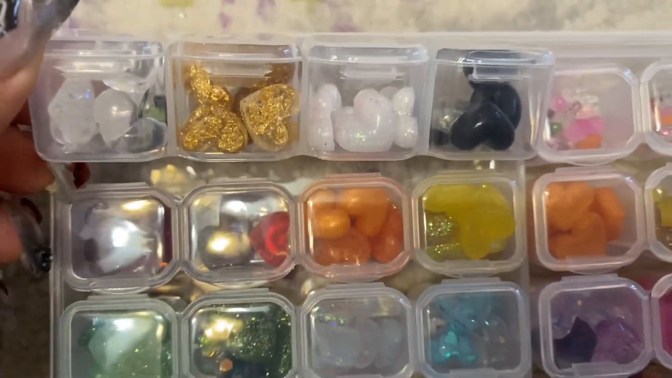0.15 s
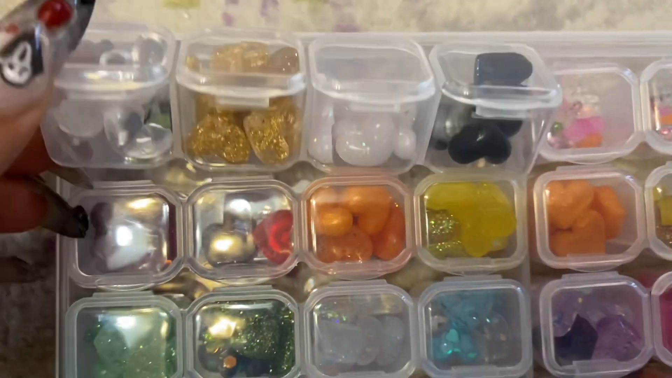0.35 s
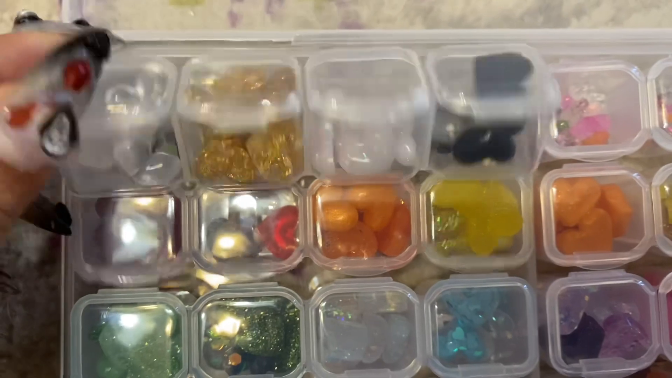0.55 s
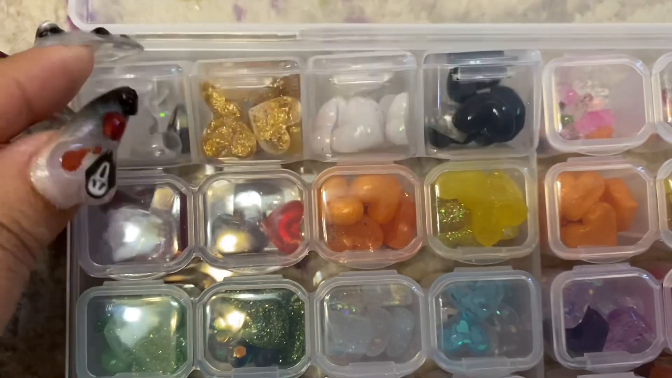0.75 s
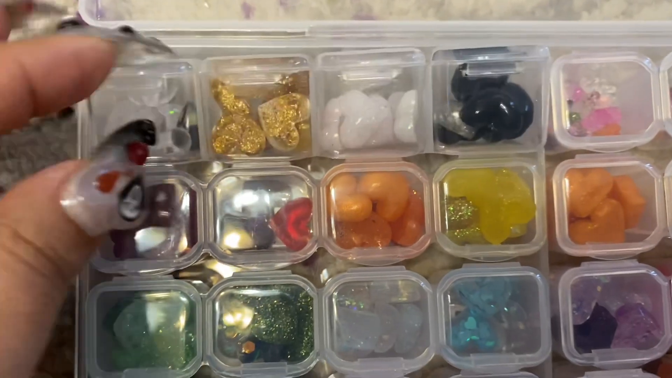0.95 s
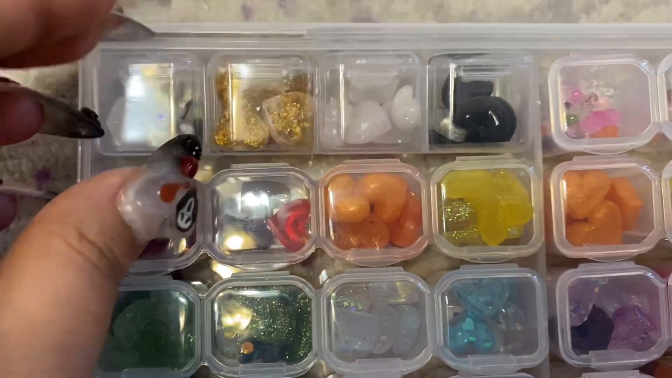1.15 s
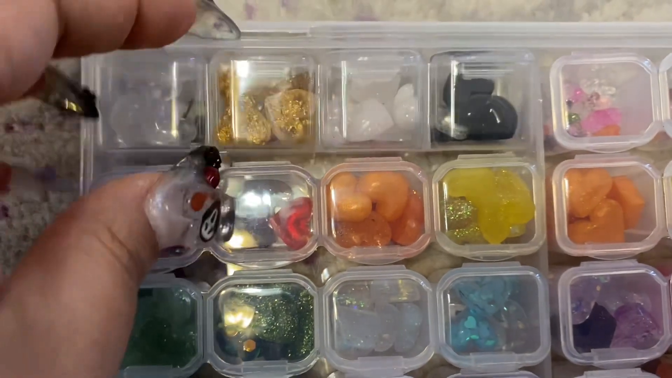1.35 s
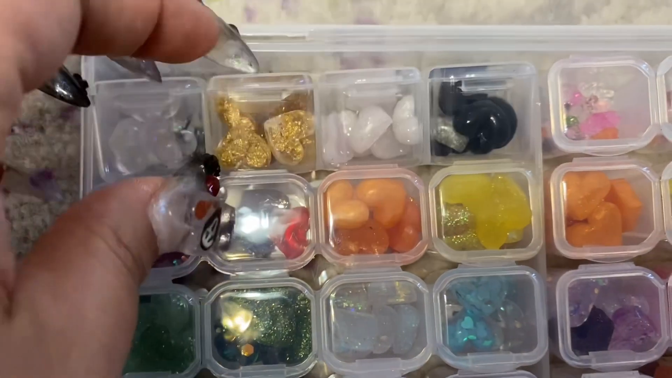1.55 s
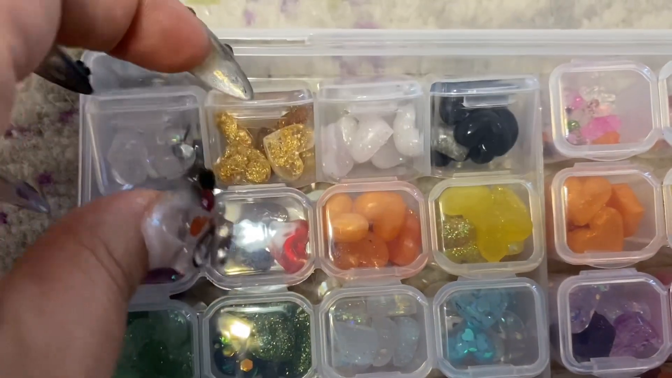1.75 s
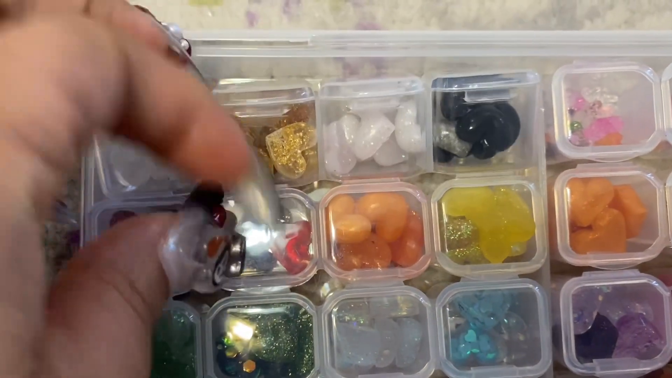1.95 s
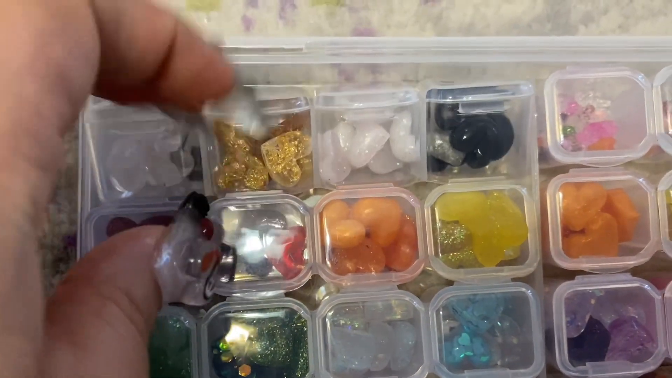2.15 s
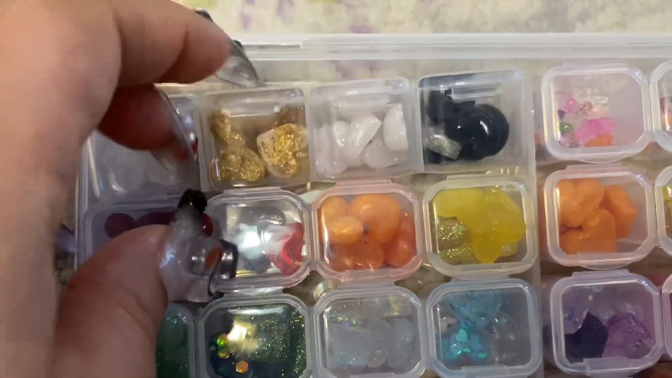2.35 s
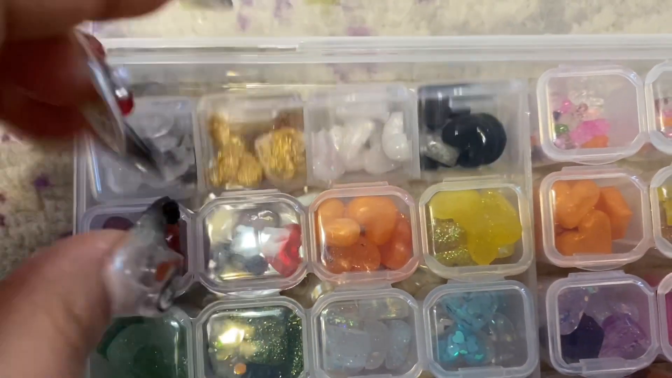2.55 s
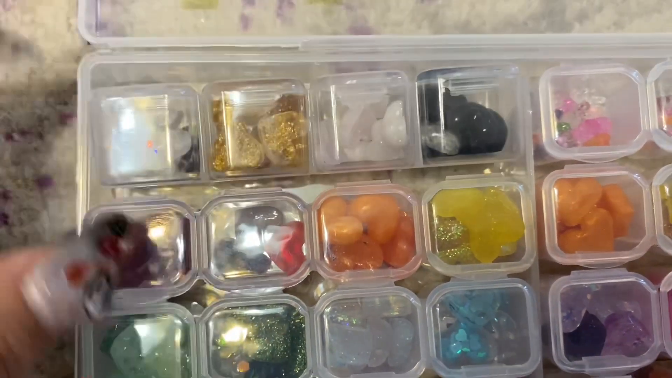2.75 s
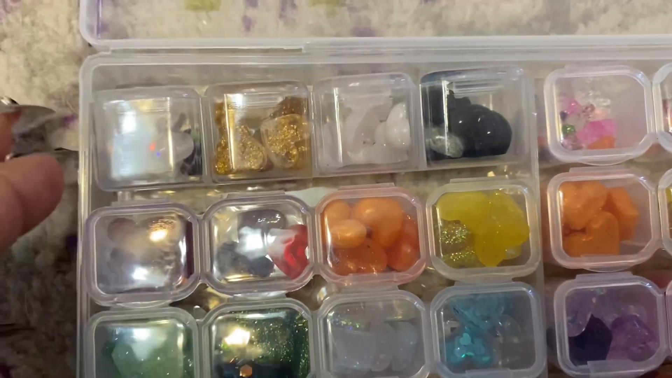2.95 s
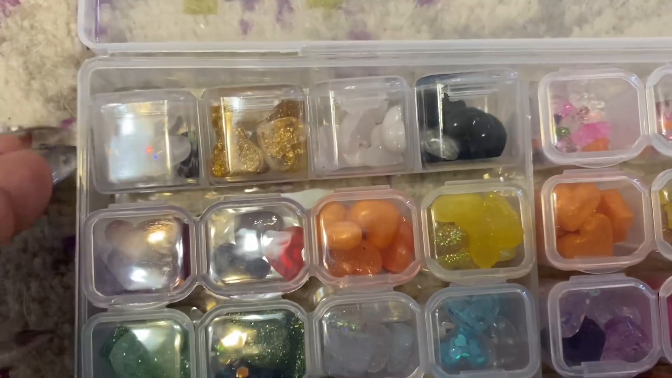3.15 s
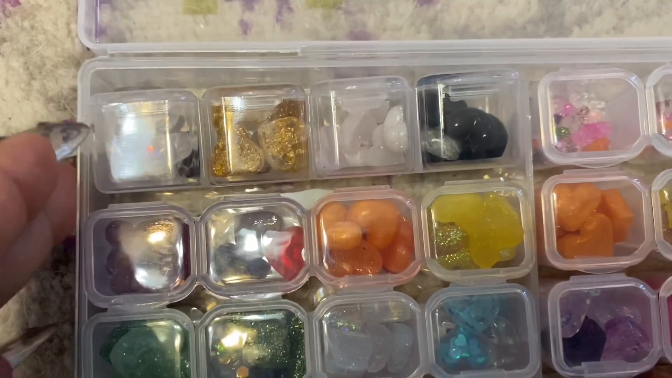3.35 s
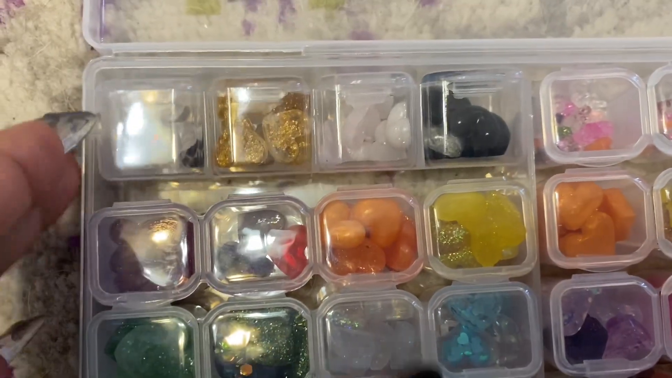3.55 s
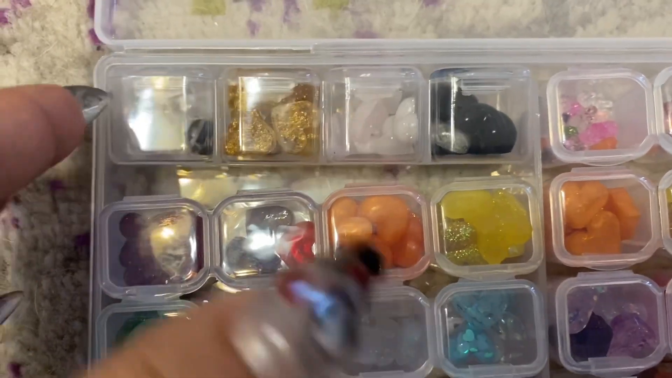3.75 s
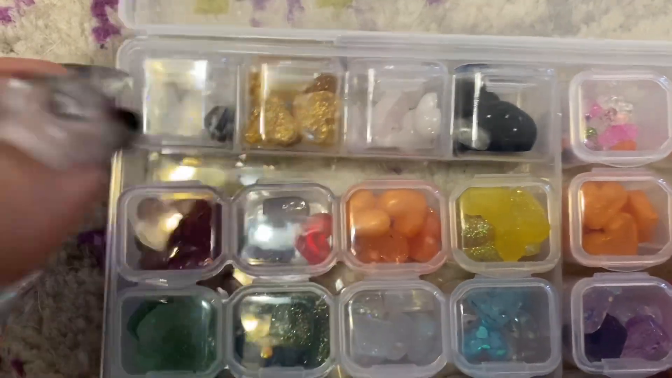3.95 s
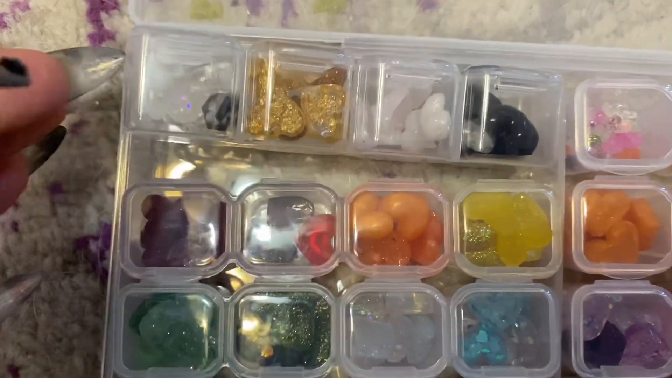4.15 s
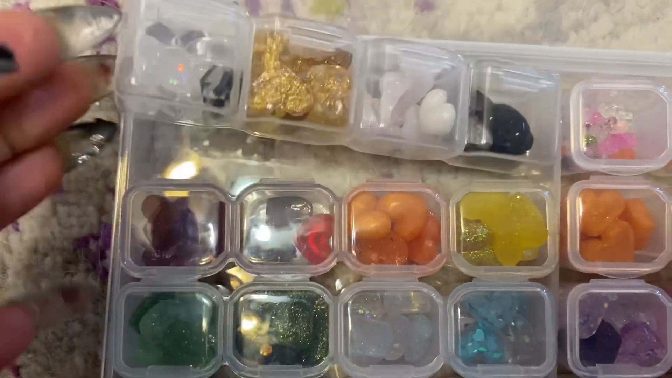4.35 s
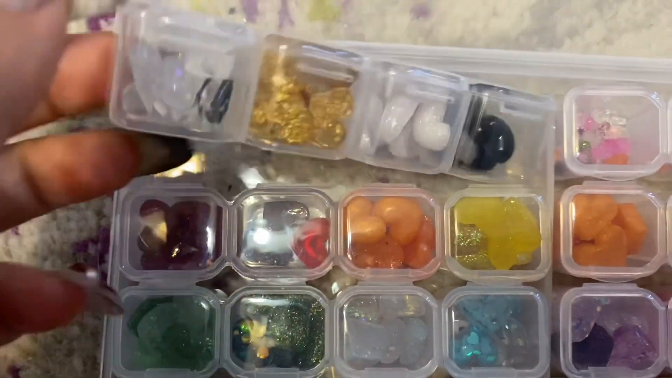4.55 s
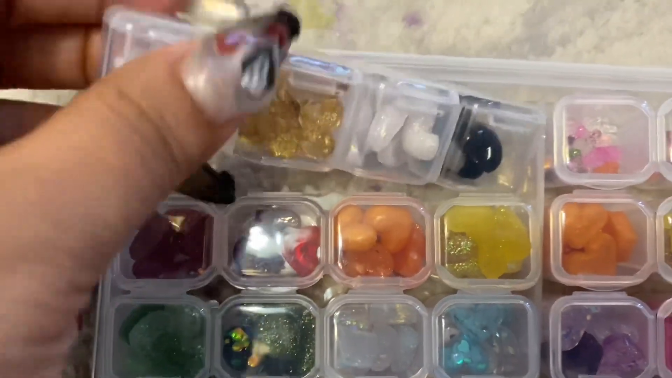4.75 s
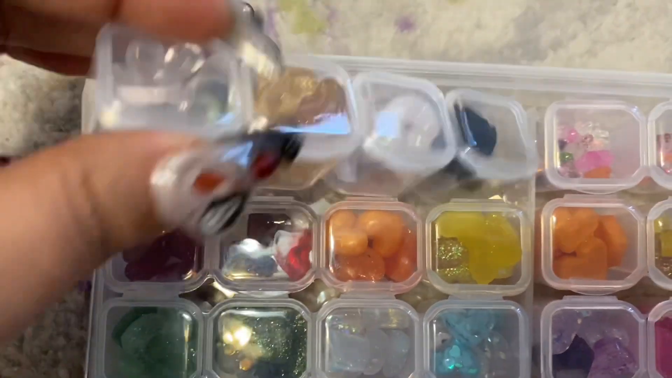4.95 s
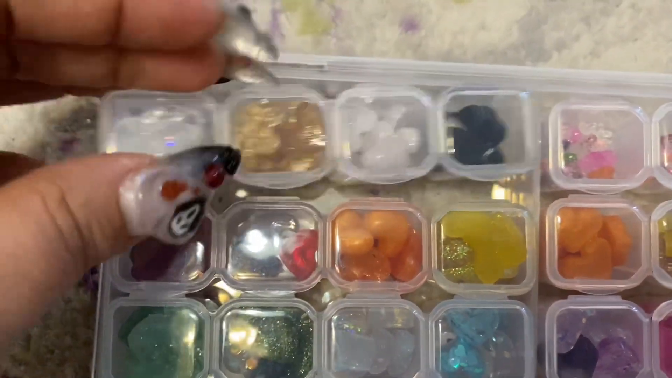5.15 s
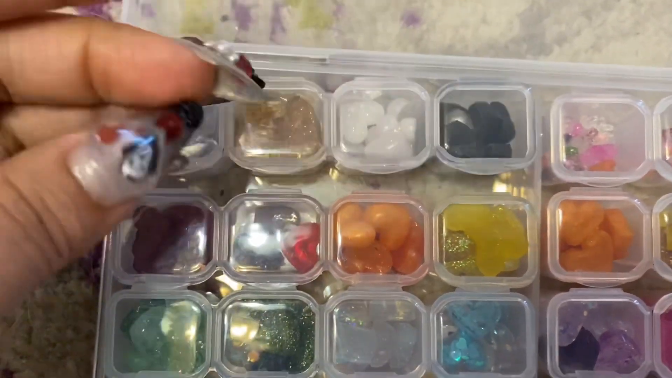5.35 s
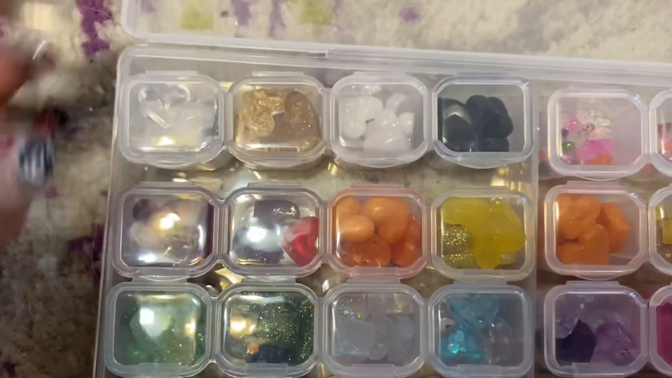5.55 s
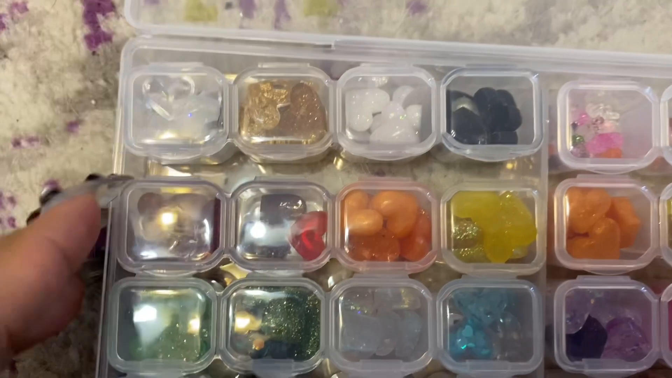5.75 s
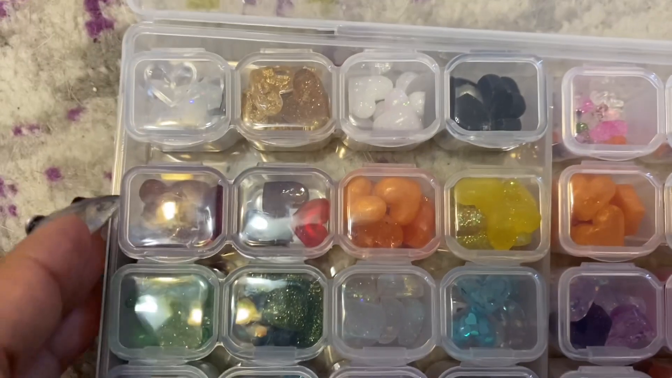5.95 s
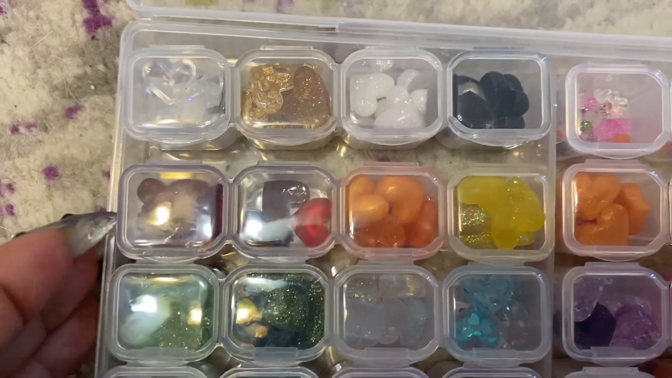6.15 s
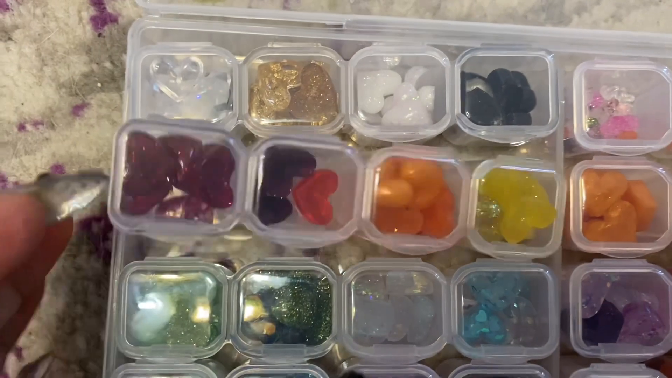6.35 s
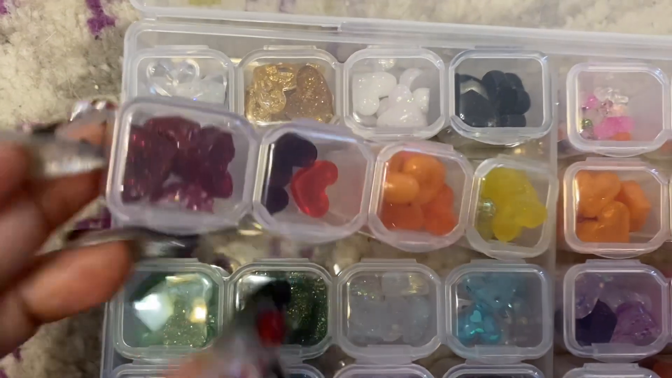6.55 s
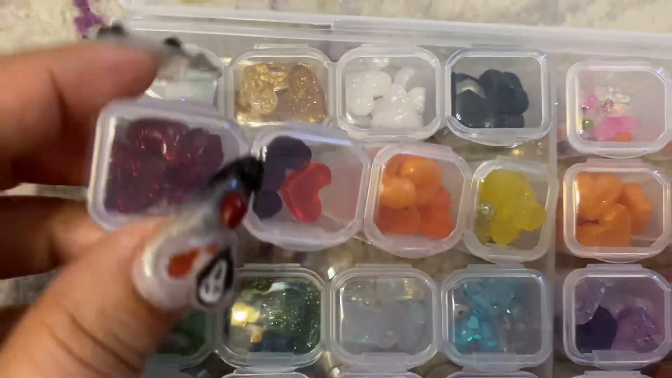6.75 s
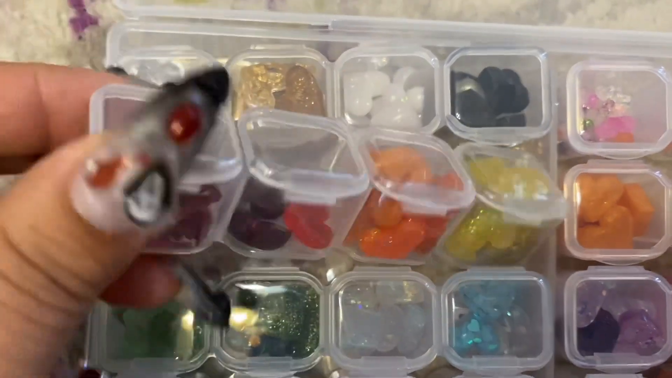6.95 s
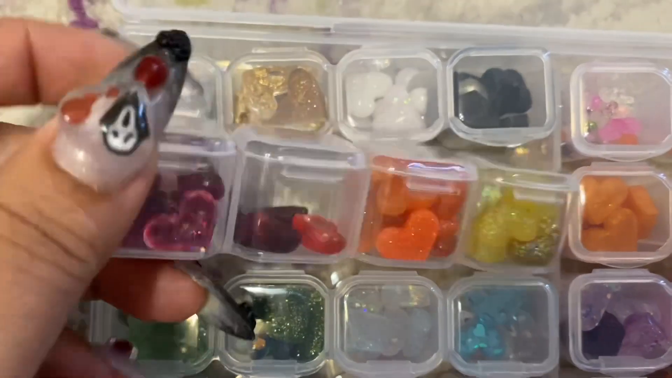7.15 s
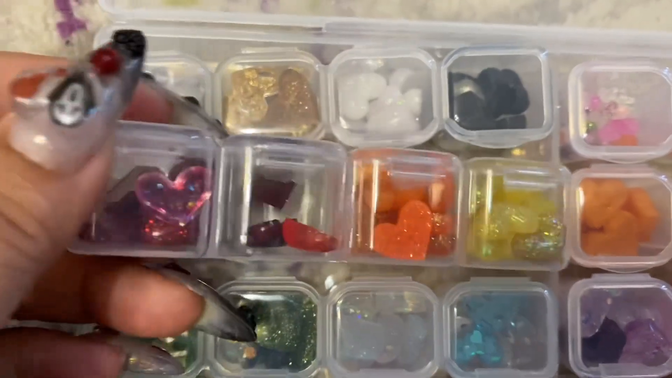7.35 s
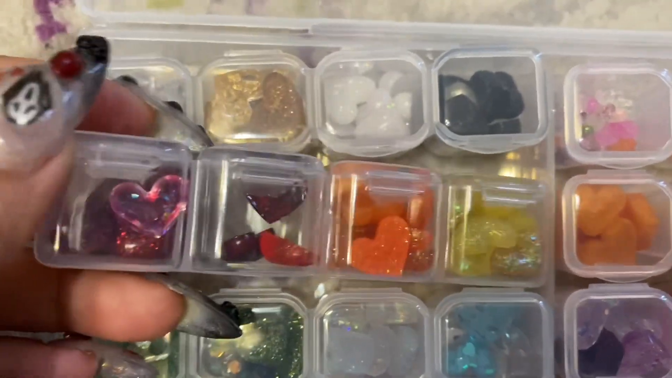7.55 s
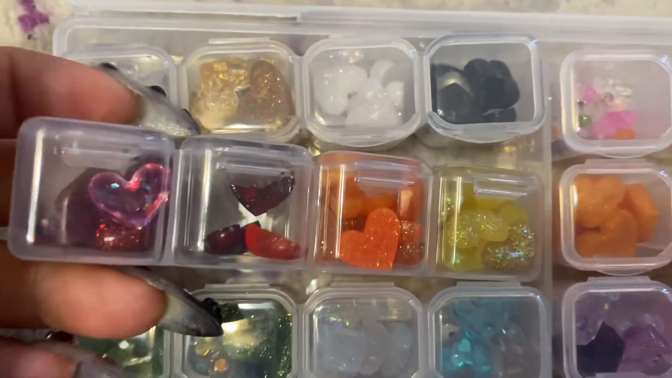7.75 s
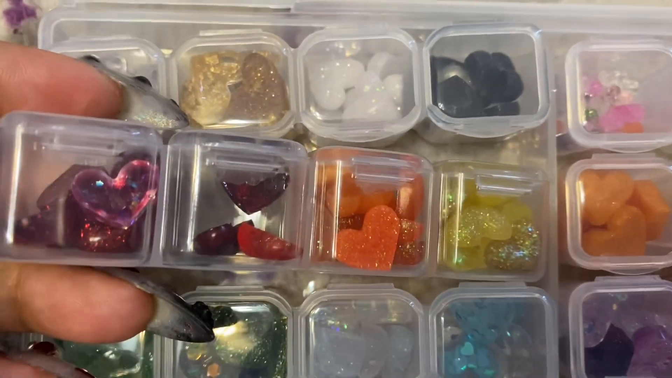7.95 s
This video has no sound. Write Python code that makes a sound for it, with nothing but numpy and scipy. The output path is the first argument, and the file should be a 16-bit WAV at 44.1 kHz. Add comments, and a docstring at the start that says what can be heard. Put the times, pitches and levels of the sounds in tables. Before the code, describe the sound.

Long fingernails pry, click and snap small lidded plastic compartments in a hollow organiser tray, with rasps, bead rattles and soft thumps.

```python
"""In a small furnished room, close to a phone, long fingernails work at a plastic organiser tray on carpet:
they pry out strips of small lidded compartments, turn them and press them back.
Contacts are short rough forces ringing resonances of walls, lids and rims, with a hollow knock from the tray.
Stick-slip jerks drive the same plastic for rasps and rubbing; skin hisses, beads rattle and low modes thump.
Diffuse noise tails give the room's faint answer, shaped noise its air; what exceeds full scale clips."""
import sys
import numpy as np
from scipy import signal
from scipy.fft import rfft, irfft
from scipy.io import wavfile
from scipy.ndimage import uniform_filter1d

SR = 44100
rng = np.random.default_rng(int(sys.argv[2]) if len(sys.argv) > 2 else 0)


def master(y):
    """Save y as 16-bit WAV."""
    cut = np.clip(np.atleast_2d(y).T, -1, 1)
    pcm = np.round(cut * 32767)  # scale
    wavfile.write(sys.argv[1], SR, pcm.astype(np.int16))


N = 353241

# resonances of the plastic, from side walls over lids to the stiff rims:
# (centre [Hz], width of one filter pass [Hz], level [dB])
PLASTIC_MODES = [(1290, 450, -4), (1788, 560, 2), (2220, 1400, 2), (2656, 410, -1.5), (3164, 530, 3.5),
                 (3588, 360, -2.5), (4375, 1000, 3), (5307, 390, -8.5), (5850, 3400, -0.5), (6790, 920, 2),
                 (7760, 610, 0), (11090, 2600, -1.5), (12300, 530, -15), (13900, 530, -6.5)]
# a catch or a rim lets go with a bright snap: (time [s], lid ring [dB], hollow knock [dB re lid],
# hard tick [dB re lid], favoured lid resonance [Hz], contact t60 [ms], left minus right [dB])
SNAP_EVENTS = [(0.535, -9, -6, -6, 2640, 13, 10.5), (0.9568, -8.5, -13, -8.5, 3830, 7, 3),
               (1.0565, -2, -5.5, -4, 3900, 34, 7), (1.1437, -15.5, -17.5, -1, 3240, 2.9, 7),
               (1.2042, -4.5, -19, -12, 4130, 5.1, 4), (1.2655, -11.5, -15.5, -9, 4430, 9, 2.5),
               (1.3425, -2, -11.5, 0.5, 3500, 23, 1), (1.3697, -1.5, -13.5, -8.5, 3140, 123, 2.5),
               (1.5244, 0.5, -11, -3, 3550, 28.4, 0), (1.7188, -2, -8, -1.5, 2960, 8.9, 2.5),
               (2.1381, -3, -16, -4.5, 3500, 8.1, -3), (2.1559, -13.5, -4, -1, 3300, 14, 4.5),
               (2.2387, -13, -11, -8, 3300, 9, 4), (2.2508, -11, -18, -10, 3200, 10, 6),
               (2.3217, -5, -27, -12, 3100, 6.8, 8), (2.3837, -12.5, -6.5, -6, 2480, 25, 8),
               (2.5111, -0.5, -11.5, -1.5, 3370, 7.4, -3.5), (2.5302, -2.5, -11, -5.5, 3220, 11, 5),
               (2.5891, -10.5, -29, -13, 3100, 8.3, 4.5), (2.792, -14, -10.5, 1, 4580, 7, -0.5),
               (3.282, -12, -21, -4.5, 3400, 7.2, 3), (3.714, -17.5, -13.5, -16, 3290, 4.5, 7.5),
               (4.4503, -12, -4.5, -5.5, 2705, 5.6, 6.5), (5.02, -11, -10, 9, 5800, 26, 1),
               (5.6446, -11.5, -15, -11.5, 2280, 5.5, 7.5), (5.6973, -11, -2.5, -7, 3200, 2.4, -0.5),
               (5.7109, -14.5, -14, -7, 3300, 7, 8.5), (6.7443, -19, -7, -5.5, 2610, 63, 4.5),
               (7.2472, -11, -32, -10.5, 3250, 2.4, 2), (7.3537, -9, -26, -11.5, 3340, 7.7, 5),
               (7.3712, -11.5, -32, -15.5, 3350, 5, 0), (7.3846, -16.5, -12, -10, 3200, 2.8, 5.5)]
# a strip bumps into the hollow tray: (time [s], knock level [dB], lid ring [dB re knock],
# knock pitch [Hz], thump on the carpet [dB])
KNOCK_EVENTS = [(0.021, -29.5, -14, 1040, -38.5), (0.09, -33.5, -52, 745, -36.5),
                (0.2367, -15.5, -23.5, 1200, -34.5), (0.6909, -4.5, 0, 733, -16),
                (0.99, -17, -3.5, 845, -28), (1.0482, 1, -2, 503, -18.5), (1.2621, -31, 4.5, 899, -32),
                (1.6937, -13, -4.5, 830, -27), (1.8395, -26.5, -16, 840, -31.5),
                (1.9043, -17, -2.5, 860, -24.5), (1.9542, -20, 5.5, 590, -25),
                (2.167, -23.5, 6.5, 590, -23.5), (2.2244, -13, -6.5, 860, -23.5),
                (2.5663, -4, -2.5, 618, -25), (4.394, -1, -1, 750, -22), (4.481, -8.5, -7.5, 715, -31.5),
                (4.6322, -16.5, -9, 695, -33), (4.975, 1, 2.5, 644, -28.5), (5.0102, 0, 4, 660, -12.5),
                (5.264, -4, 6.5, 395, -16.5), (5.721, -11, -8.5, 830, -38), (5.9516, -27, -3, 786, -35),
                (6.3241, -13, -8, 700, -37), (6.4885, -18, -21, 740, -48), (6.753, -26.5, 1, 798, -50),
                (6.812, -41.5, -18, 760, -37.5), (6.9166, -2.5, -11, 643, -24.5),
                (7.1535, -22, -1.5, 780, -30.5), (7.593, -11.5, -10, 700, -30.5)]


def undb(db):
    """Amplitude factor of a level in dB."""
    return 10 ** (np.asarray(db) / 20)


def unit(x):
    """Scale to rms 1."""
    return x / np.sqrt(np.mean(x ** 2) + 1e-20)


def burst(x):
    """Scale a short stereo sound to the energy of 2 ms at rms 1."""
    return x * np.sqrt(2 * .002 * SR / (np.sum(x ** 2) + 1e-20))


def decay(t, t60_s):
    """Exponential decay by 60 dB in t60_s seconds."""
    return np.exp(-np.log(1000) * t / t60_s)


def resonate(x, hz, width):
    """A resonance applied twice, for steep skirts; the width in Hz is that of one pass."""
    b, a = signal.iirpeak(min(hz, SR * .45), hz / width, fs=SR)
    once = signal.lfilter(b, a, x + 1e-18)
    return signal.lfilter(b, a, once)


def band(x, low_hz, high_hz):
    """Band-pass."""
    sos = signal.butter(2, [low_hz, min(high_hz, SR * .48)], "band", fs=SR, output="sos")
    return signal.sosfilt(sos, x)


def pair(count, apart):
    """Left and right noise: a common part, and a part that differs."""
    common, side = rng.standard_normal((2, count))
    return np.array([common + apart * side, common - apart * side])


def pan(db):
    """Gains of the two channels; db is left minus right."""
    return undb(np.array([[db], [-db]]) / 2)


def add(out, s, x):
    """Mix x into out from time s on."""
    i = max(int(s * SR), 0)
    out[:, i:i + x.shape[1]] += x[:, :max(N - i, 0)]


def walk(rate_hz):
    """Slow chance: random levels, rate_hz of them a second, joined smoothly, spread near 1."""
    levels = rng.standard_normal(400)
    joined = np.interp(np.arange(N) / SR * rate_hz, np.arange(400), levels)
    return 1.3 * uniform_filter1d(joined, size=1500)


def swell(start, end, edge_s):
    """Rise smoothly at start, hold, and fall at end."""
    t = np.arange(N) / SR
    return np.sin(np.pi / 2 * np.clip(np.minimum(t - start, end - t) / edge_s, 0, 1))


def air(level_db=-57):
    """Still air of the room: low rumble and faint hiss as shaped noise; now and then a soft low tone."""
    # colour of the noise: (frequency [Hz], relative density [dB per Hz])
    air_colour = [(20, -23), (40, -4), (70, 0.5), (130, -4), (200, -11), (350, -12), (700, -33),
                  (3000, -34), (8000, -38.5), (16000, -37.5)]
    # faint tones that swell and fade: (start [s], end [s], middle pitch [Hz], level [dB])
    low_tones = [(2.779, 2.901, 337, -48), (7.11, 7.277, 272, -52), (7.75, 7.977, 274, -57)]
    hz, db = np.transpose(air_colour)
    colour = undb(np.interp(np.log(np.arange(N // 2 + 1) * SR / N + 1), np.log(hz), db))
    out = undb(level_db) * unit(irfft(rfft(pair(N, apart=0.12)) * colour, N))
    for start, end, tone_hz, tone_db in low_tones:
        wavering_hz = tone_hz * (1 + 0.012 * walk(rate_hz=7.8))
        phase = 2 * np.pi * np.cumsum(wavering_hz) / SR
        out = out + undb(tone_db) * swell(start, end, edge_s=0.045) * np.sin(phase)
    return out


def room(x, gap_s=0.0068):
    """A faint diffuse tail, decaying noise in four bands, lasts longest in the presence range."""
    # decay by band: (lower edge [Hz], upper edge [Hz], t60 [s], level before the band-pass [dB])
    room_bands = [(100, 500, .45, -30), (500, 2200, .52, -27), (2200, 4600, .66, -26),
                  (4600, 12000, .34, -30)]
    t = np.arange(int(.8 * SR)) / SR
    response = 0
    for low_hz, high_hz, t60, db in room_bands:
        tail = pair(len(t), apart=0.88) * decay(t, t60) * np.minimum(t / gap_s, 1)
        response = response + undb(db) * band(unit(tail) / np.sqrt(len(t)), low_hz, high_hz)
    return signal.fftconvolve(x, response, axes=1)[:, :N]


def ports(x):
    """Sound reaches the two microphone ports with a phase difference that depends on frequency."""
    # (frequency [Hz], phase by which left leads [rad])
    port_phase = [(0, 0.5), (700, 0.39), (1800, 1.38), (3100, 0.56), (5200, 0), (7100, -2.5), (8400, -3),
                  (11000, -7), (16000, -12.5)]
    hz, radians = np.transpose(port_phase)
    turn = np.exp(1j * np.interp(np.arange(N // 2 + 1) * SR / N, hz, radians))
    return np.array([irfft(rfft(x[0]) * turn, N), x[1]])


def lifted(s):
    """Whether a strip is held clear of the tray at time s."""
    # (start [s], end [s])
    lift_spans = [(4.3, 5.2), (6.65, 7.55)]
    return any(start < s < end for start, end in lift_spans)


def contacts():
    """All snaps, knocks and taps as (s, lid dB, knock dB, clack dB, tick dB, lid Hz, knock Hz, t60 ms, pan dB)."""
    # a nail taps lightly on the plastic: (time [s], lid ring [dB], hollow knock [dB re lid])
    tap_events = [(0.2987, -36, 6), (0.3748, -29.5, -8), (0.417, -28, 4.5), (0.58, -22, -8),
                  (0.6103, -16, -27.5), (0.6298, -17.5, -16.5), (0.6999, -12, -10.5), (0.7824, -30.5, 5.5),
                  (0.882, -24.5, -3.5), (0.9107, -23.5, -0.5), (1.083, -16, -10), (1.764, -26, -14.5),
                  (2.0533, -24, -19), (2.0692, -24, -7.5), (2.1513, -16, -5), (2.1877, -24.5, -6.5),
                  (3.018, -37, 9.5), (3.305, -29, 7), (3.3531, -45, 15), (3.6114, -27.5, 1),
                  (3.632, -38.5, 10.5), (3.6863, -26.5, -10), (3.9718, -31, -12), (4.3109, -36.5, -0.5),
                  (4.3757, -23, -15.5), (4.505, -20.5, -18), (4.5458, -30.5, -4), (4.6949, -31.5, -3.5),
                  (4.7212, -29, -14.5), (4.759, -23.5, -18), (4.8776, -29.5, 3.5), (4.9348, -20, 5),
                  (5.0595, -15.5, -22), (5.0699, -20, -5), (5.1215, -19.5, -9.5), (5.1593, -20.5, -3),
                  (5.8939, -40, 3), (6.4047, -39, -1), (6.43, -40, 2), (6.683, -18.5, -16.5),
                  (6.725, -24, -28), (6.835, -22.5, -14.5), (6.9529, -21.5, -4), (7.0016, -28.5, 2.5),
                  (7.0836, -34, 5.5), (7.2237, -31.5, -9), (7.399, -21, -11), (7.5199, -30.5, -3.5)]
    hand_pan_db = 3.5  # the hand works at the left end
    # clack (side walls) and tick (rims) are in dB re the lid; clicks() shifts both
    snaps = [(s, db, knock_db, -6, tick_db, lid_hz, 820, t60_ms, pan_db)
             for s, db, knock_db, tick_db, lid_hz, t60_ms, pan_db in SNAP_EVENTS]
    knocks = [(s, db + lid_db, -lid_db, -2.5, -6, 2400, knock_hz, 14, hand_pan_db)
              for s, db, lid_db, knock_hz, _ in KNOCK_EVENTS]
    taps = [(s, db, knock_db, 0, -4.5, 3380, 780, 9.2, hand_pan_db)
            for s, db, knock_db in tap_events]
    return snaps + knocks + taps


def shoves(snap_thump_db=-27.5):
    """Knocks push the tray against the carpet, and so do snaps while the strip sits in it: (s, dB)."""
    from_knocks = [(s, thump_db) for s, *_, thump_db in KNOCK_EVENTS]
    from_snaps = [(s, db + snap_thump_db) for s, db, *_ in SNAP_EVENTS if not lifted(s)]
    return from_knocks + from_snaps


def thumps(push_s=0.012, lead_s=.002, scuff_db=-9, scuff_s=0.016):
    """A soft shove rocks the whole tray in its low modes, and its hollow floor scuffs for a moment."""
    # the loaded tray on the carpet: (middle pitch [Hz], t60 [s], middle level [dB])
    tray_modes = [(73, 0.13, -8.5), (102, 0.069, -1), (122.3, 0.089, -2), (158, 0.13, -4), (261, 0.013, -2),
                  (364.4, 0.041, -0.5)]
    out = np.zeros((2, N))
    t = np.arange(int(.3 * SR)) / SR
    onset = np.sin(np.pi / 2 * np.minimum(t / push_s, 1)) ** 2
    for s, db in shoves():
        rock = 0
        for hz, t60, mode_db in tray_modes:
            detune, strength = rng.standard_normal(2)
            swing = np.sin(2 * np.pi * (hz * (1 + .07 * detune) * t + rng.random()))
            rock = rock + undb(mode_db + 2 * strength) * swing * decay(t, t60) * onset
        loudest = np.sqrt(uniform_filter1d(rock ** 2, size=800).max())
        scuff = unit(resonate(pair(len(t), apart=.15), 680, 1100)) * onset * np.exp(-t / scuff_s)
        add(out, s - lead_s, undb(db) * (rock / loudest + undb(scuff_db) * scuff) * pan(0.86))
    return out


def strip_speed(rest_db=-70.5, skid_db=-35.5, skid_db_per_db=.6, skid_s=0.045):
    """A strip slides while the hand moves it, and skids on, slowing down, after every contact."""
    # the hand moves a strip about: (start [s], end [s], speed [dB])
    hand_moves = [(-.1, 0.186, -60), (0.171, 0.493, -53), (0.473, 1.457, -45.5), (1.45, 2.72, -55.5),
                  (3.15, 3.55, -56.5), (3.526, 4.083, -53), (4.216, 4.85, -47.5), (4.81, 5.285, -44.5),
                  (5.24, 6.287, -62.5), (6.3, 6.901, -59), (6.891, 7.502, -49)]
    jolts = np.zeros(N)
    for s, db, *_ in contacts():
        jolts[int(s * SR)] += undb(skid_db + skid_db_per_db * db) ** 2
    skid = np.sqrt(signal.lfilter([1], [1, -np.exp(-2 / (skid_s * SR))], jolts))
    moved = sum(undb(db) * swell(start, end, edge_s=0.021) for start, end, db in hand_moves)
    return undb(rest_db) + skid + moved


def plastic(force, apart, touch_db, size=1):
    """A rough force rings every mode as far as the touched spot allows: wall clack, lid ring, rim tick."""
    clack_below_hz, tick_above_hz = 2450, 5450
    parts = np.zeros((3, 2, len(force)))
    for (hz, width, db), spot_db in zip(PLASTIC_MODES, touch_db):
        group = int(hz > clack_below_hz) + int(hz > tick_above_hz)
        ringing = unit(resonate(force * pair(len(force), apart), hz * size, width))
        parts[group] += undb(db + spot_db) * ringing
    return parts


def friction(slips_per_s, scatter_db, slip_s, smooth, knock_db, clack_db, tick_db, wander_db):
    """Stick and slip: uneven jerks drive the plastic, its colour wandering with the contact spot; rms 1."""
    times = np.cumsum(rng.gamma(2, 1 / (2 * slips_per_s), int(2 * slips_per_s * N / SR)))
    places = (times[times < N / SR] * SR).astype(int)
    jerks = np.zeros(N)
    jerks[places] = undb(scatter_db * np.clip(rng.standard_normal(len(places)), -2, 2))
    slips = signal.lfilter([1], [1, -np.exp(-1 / (slip_s * SR))], jerks)
    force = unit(slips) + smooth
    force /= np.sqrt(uniform_filter1d(force ** 2, size=1800) + 1e-9)  # the finger keeps a steady pressure
    touch_db = [wander_db * walk(rate_hz=9.1) for _ in PLASTIC_MODES]
    clack, lid, tick = plastic(force, apart=0.43, touch_db=touch_db)
    knock = resonate(force * pair(N, apart=0.16), 730, 630) * pan(2.7)
    shell = unit(lid) + undb(clack_db) * unit(clack) + undb(tick_db) * unit(tick)
    return unit(shell + undb(knock_db) * unit(knock))


def sliding(rub_db=-3.0, rumble_db=-1.0):
    """Light rubbing hisses in the lids, and the handled tray rumbles, both as loud as the strip is fast."""
    speed = strip_speed()
    rub = friction(slips_per_s=32, scatter_db=0, slip_s=0.00033, smooth=0.71,
                   knock_db=2.0, clack_db=3.5, tick_db=-2.5, wander_db=3.5)
    rumble = unit(resonate(pair(N, apart=0.11), 96, 170))
    return speed * (undb(rub_db) * rub + undb(rumble_db) * rumble) * pan(1.5)


def strokes():
    """Skin glides without catching: a soft hiss that wavers with the finger's pressure."""
    # smooth strokes of a fingertip over the plastic:
    # (start [s], end [s], level before the wavering [dB], bright part re dull part [dB])
    stroke_events = [(3.42, 3.614, -54, -21), (3.837, 4.06, -45.5, -10), (6.337, 6.432, -56, 3)]
    out = 0
    dull = unit(resonate(pair(N, apart=.4), 3200, 2200))
    dull = dull + undb(-4) * unit(resonate(pair(N, apart=0.36), 1200, 1600))
    bright = unit(resonate(pair(N, apart=0.35), 6500, 3000))
    bright = bright + undb(3.5) * unit(resonate(pair(N, apart=.6), 11200, 3000))
    for start, end, db, bright_db in stroke_events:
        hiss = unit(dull + undb(bright_db) * bright)
        out = out + undb(db) * swell(start, end, edge_s=0.04) * hiss
    return out * undb(2 * walk(rate_hz=25))


def beads(chances_per_s=90, busy_db=-38, scatter_db=4, bead_db=3, middle_hz=2500, spread_octaves=0.72,
          width=0.31, body_db=0, brush_s=0.00047):
    """Loose beads knock about, more often the faster a strip moves; each hit has its pitch and rings a cup."""
    out = np.zeros((2, N))
    strip_db = 20 * np.log10(strip_speed())
    t = np.arange(int(.02 * SR)) / SR
    force = np.exp(-t / brush_s)
    for when in np.cumsum(rng.exponential(1 / chances_per_s, size=900)):
        strength, octaves, side = np.clip(rng.standard_normal(3), -2, 2)
        hz = middle_hz * 2 ** (spread_octaves * octaves)
        bead = resonate(force * pair(len(t), apart=0.22), hz, hz * width)
        cup = resonate(force * pair(len(t), apart=0.32), 1500, 2900)
        speed_db = strip_db[min(int(when * SR), N - 1)]
        # at busy_db and above, every chance becomes a hit
        if rng.random() < undb(speed_db - busy_db) and when < N / SR:
            loudness = undb(speed_db + bead_db + scatter_db * strength)
            hit = burst(bead) + undb(body_db) * burst(cup)
            add(out, when, loudness * hit * pan(1.5 + 2 * side))
    return out


def rasps(soft_db=-27):
    """Ribs judder past the tray's edge: a hollow crunch under light pressure, a bright rattle under more."""
    # an edge judders along its neighbour: (start [s], end [s], first level [dB], last level [dB])
    rasp_events = [(0.208, 0.239, -40.5, -28.5), (0.508, .535, -44, -32), (0.533, 0.596, -12.5, -21),
                   (0.637, 0.708, -28.5, -20), (0.981, 1.031, -26.5, -28.5), (1.039, 1.109, -18.5, -30.5),
                   (1.354, 1.403, -8.5, -24.5), (1.654, 1.722, -28, -21), (1.933, 1.95, -23, -20),
                   (2.128, 2.178, -29, -38), (2.222, 2.261, -21, -30.5), (2.509, 2.595, -23.5, -28.5),
                   (3.62, 3.691, -54, -36.5), (4.376, 4.406, -14.5, -6.5), (4.408, 4.463, -14.5, -34.5),
                   (4.737, 4.775, -31, -36), (4.866, 4.975, -33, -18.5), (4.974, 5.006, -14, -15.5),
                   (5.005, 5.023, 1.5, -4.5), (5.027, 5.081, -13, -23.5), (5.252, 5.264, -32, -14),
                   (5.267, 5.339, -9.5, -36), (5.648, 5.673, -15, -41), (6.734, 6.765, -27.5, -26.5),
                   (6.875, 6.924, -39, -13), (6.924, 6.946, -26.5, -27), (7.106, 7.169, -43, -31.5)]
    t, pressure = np.arange(N) / SR, np.zeros(N)
    for start, end, first_db, last_db in rasp_events:
        level_db = np.interp(t, [start, end], [first_db, last_db])
        pressure += (t >= start) * (t < end) * undb(level_db)
    pressure = np.maximum(uniform_filter1d(pressure, size=130), 0)
    hard = pressure / (pressure + undb(soft_db))
    rattle = friction(slips_per_s=300, scatter_db=4.5, slip_s=0.0013, smooth=.3,
                      knock_db=-6, clack_db=1, tick_db=0.5, wander_db=1.0)
    crunch = friction(slips_per_s=220, scatter_db=0.5, slip_s=0.0016, smooth=0.34,
                      knock_db=1.5, clack_db=9, tick_db=-16, wander_db=4)
    return pressure * (np.sqrt(hard) * rattle + np.sqrt(1 - hard) * crunch) * pan(1.6)


def hollow(push, hz, width, floor_ratio=.49, floor_db=-14):
    """The tray's knock falls in pitch: first its walls answer, then, lower, its floor."""
    def note(lag_s, note_hz):
        late = np.roll(push, int(lag_s * SR), axis=1)
        return burst(resonate(late, note_hz, note_hz * width))
    walls = note(.0008, hz)
    floor = note(.004, hz * floor_ratio)
    return walls + undb(floor_db) * floor


def clicks(rise_s=0.00021, lead_s=0.00095, knock_width=0.79, knock_grit=0.34, ring_db=-28, ring_t60_s=0.056,
           swell_in_db=-21, swell_in_s=.0011, tick_damping=.15):
    """Each contact swells briefly, strikes and rings; the tray below answers with a hollow knock."""
    clack_db_per_db = 0.17  # the hollower a contact, the more side wall
    free_clack_db, free_tick_db = 6.5, 7  # walls and rims of a lifted strip ring more freely
    focus_db, focus_octaves = 4.5, .22  # how much the favoured resonance stands out, and how narrowly
    # a loose strip falls back once; a hollow bump bounces more than a crisp snap
    rebound_s, rebound_db, rebound_db_per_db = .014, -20.5, 0.38
    out = np.zeros((2, N))
    before = int(.008 * SR)
    t = (np.arange(int(.055 * SR)) - before) / SR
    after = np.maximum(t, 0)
    mode_hz = np.array(PLASTIC_MODES)[:, 0]
    for s, db, knock_db, clack_db, tick_db, lid_hz, knock_hz, t60_ms, pan_db in contacts():
        clack_db += clack_db_per_db * knock_db + free_clack_db * lifted(s)
        tick_db += free_tick_db * lifted(s)
        snap = decay(after, t60_ms * 1e-3)
        shiver = undb(ring_db) * decay(after, ring_t60_s)
        swell_in = undb(swell_in_db) * np.exp(-abs(t) / swell_in_s)
        force = (1 - np.exp(-after / rise_s)) * (snap + shiver) + swell_in
        # no two lids, and no two spots on a lid, ring quite alike
        touch_db = 3 * rng.standard_normal(len(PLASTIC_MODES))
        size = 1 + .025 * rng.standard_normal()
        touch_db += focus_db * np.exp(-(np.log2(mode_hz / lid_hz) / focus_octaves) ** 2)
        clack, lid, tick = plastic(force, apart=0.45, touch_db=touch_db, size=size)
        tick = tick * snap ** tick_damping  # the stiff rims fall silent first
        impulse = signal.unit_impulse(len(t), before) * rng.choice([-1, 1])
        push = impulse + knock_grit * force * pair(len(t), apart=0.05)
        knock = hollow(push, knock_hz, knock_width) * pan(3.8)
        ring = (burst(lid) + undb(clack_db) * burst(clack)) * pan(pan_db)
        rim = undb(tick_db) * burst(tick) * pan(pan_db - 3.5)
        sound = ring + rim + undb(knock_db) * burst(knock)
        start = s - lead_s - before / SR
        add(out, start, undb(db) * sound)
        fallback_db = db + rebound_db + rebound_db_per_db * knock_db
        add(out, start + rebound_s * (.5 + rng.random()), undb(fallback_db) * sound)
    return out


def scene():
    """The handled tray, close by and without its deepest bass, in its room and still air."""
    tray = clicks() + rasps() + sliding() + beads() + strokes() + thumps()
    tray = signal.sosfilt(signal.butter(2, 48, "high", fs=SR, output="sos"), tray)
    return ports(tray) + room(tray) + air()


def record(dry):
    """The phone clips whatever exceeds full scale and cuts the top above 16.3 kHz."""
    clipped = np.clip(dry, -1, 1)
    return signal.sosfilt(signal.ellip(8, .2, 70, 16300, fs=SR, output="sos"), clipped)


dry = scene()
out = record(dry)
master(out)
```